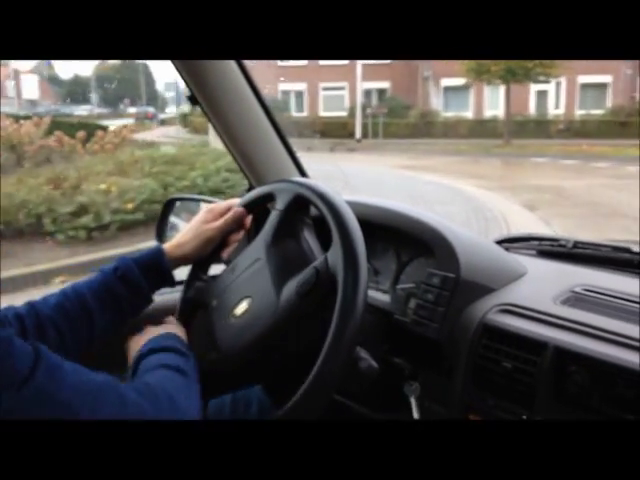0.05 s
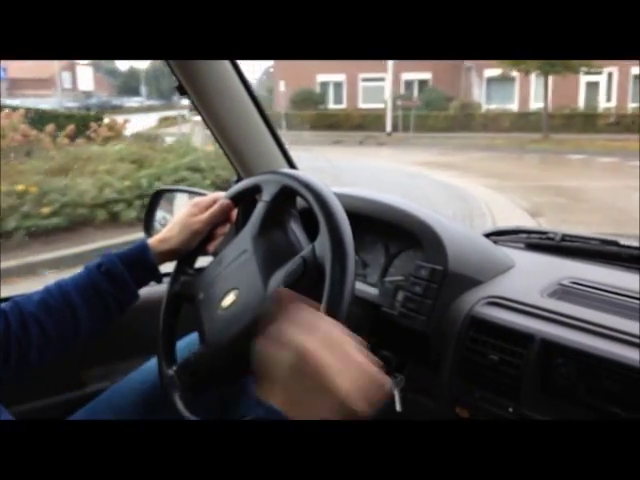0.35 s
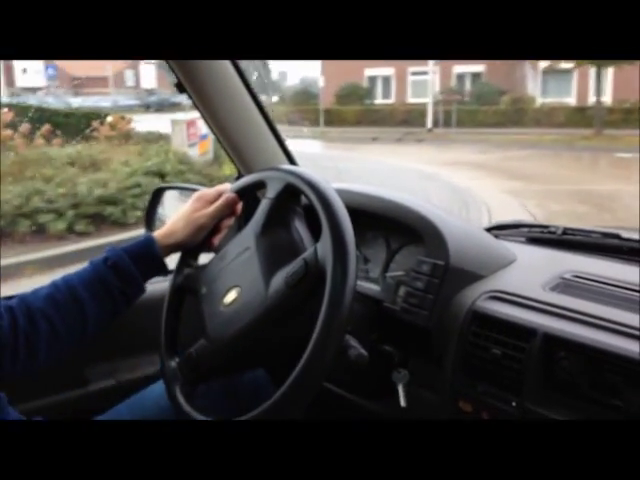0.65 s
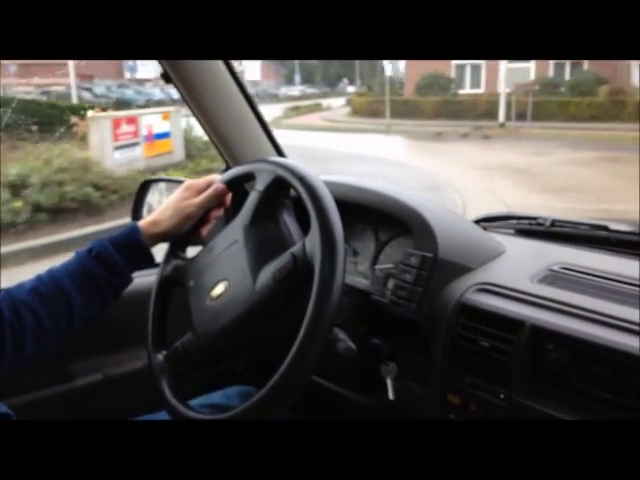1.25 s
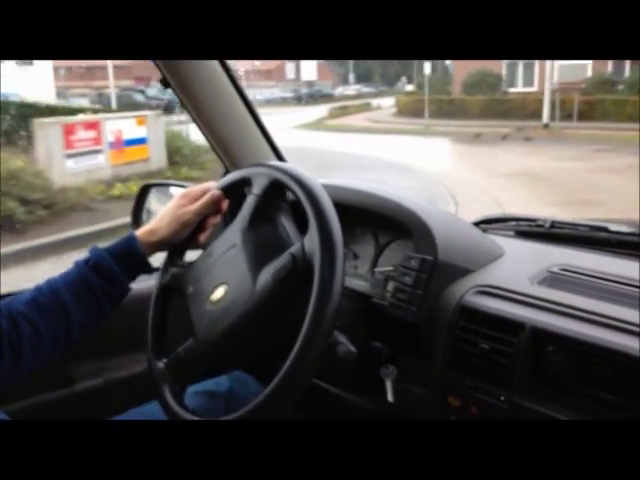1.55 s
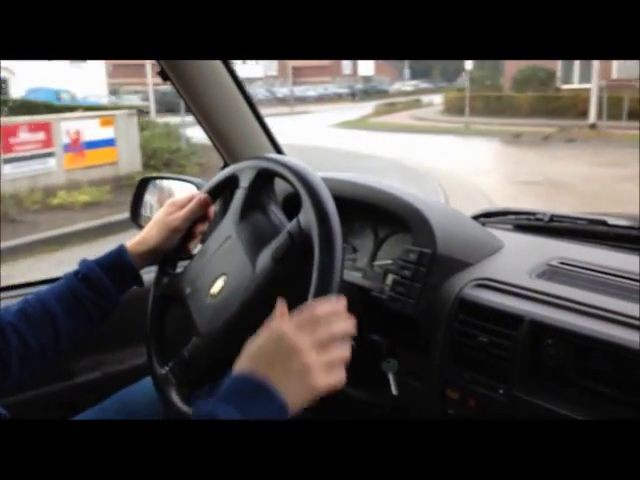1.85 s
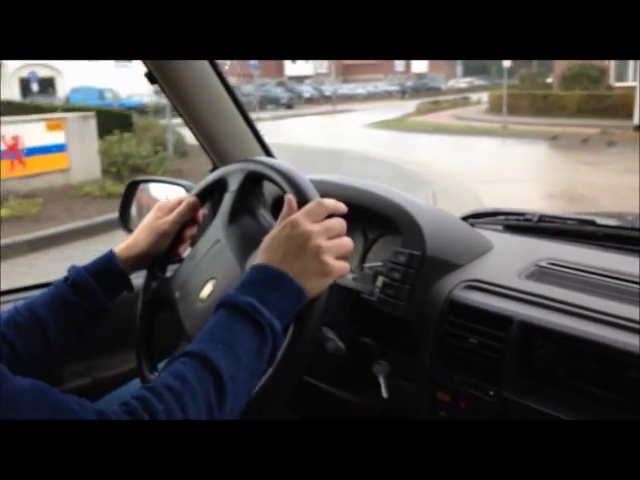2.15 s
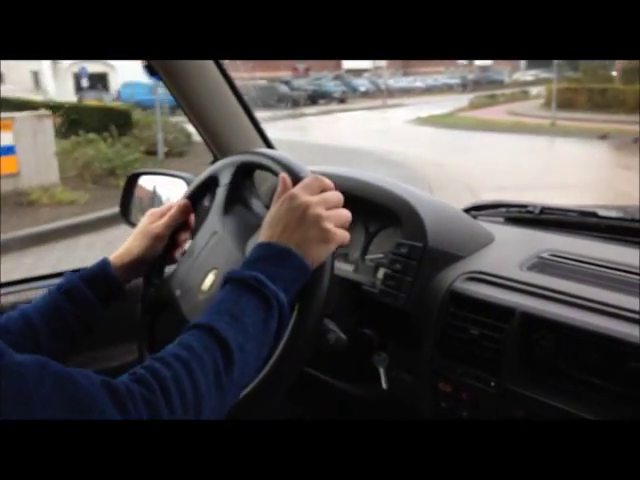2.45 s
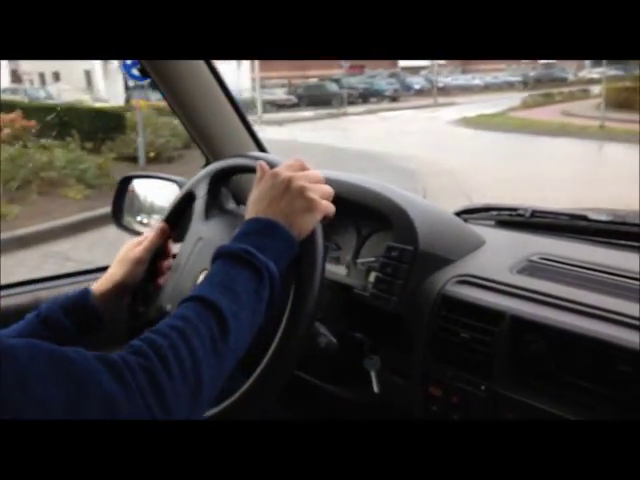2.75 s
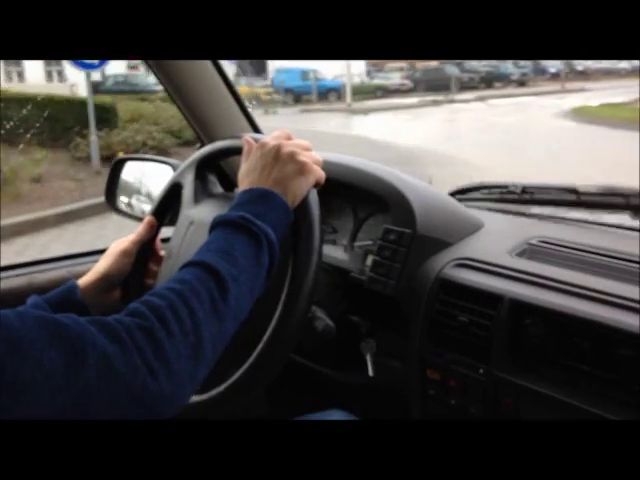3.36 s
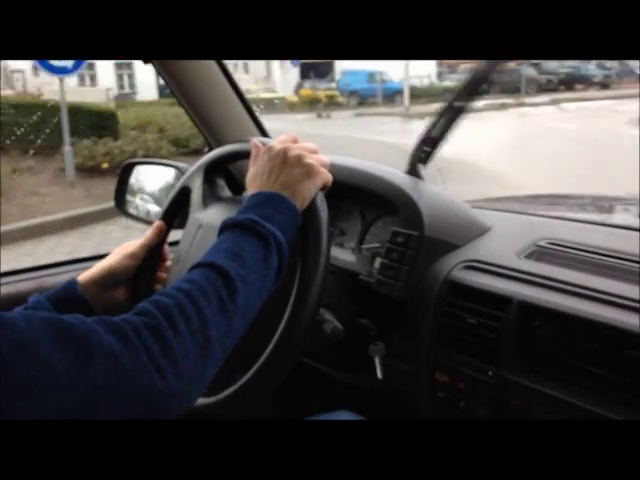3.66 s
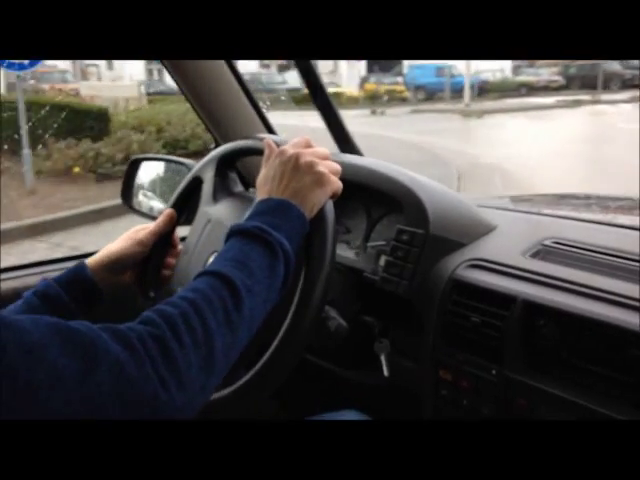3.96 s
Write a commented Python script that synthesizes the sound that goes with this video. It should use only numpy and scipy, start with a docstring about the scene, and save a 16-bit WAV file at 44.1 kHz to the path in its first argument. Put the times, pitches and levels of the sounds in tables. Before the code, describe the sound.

A car engine booms low, heard from the passenger seat, then sinks to near idle over road rumble and faint wet tyre hiss. Trim ticks lightly, the steering whines, a wiper sweeps once, and plastic knocks close by.

```python
"""A five-cylinder engine booms, heard inside a car turning on a wet road, then sinks to near idle as the
driver lifts off. The road rumbles through the body, wet tyres hiss, plastic trim ticks and keys clink.
A rough patch drums the panels, and the power steering moans and whines under load. After a soft tap and
a click, a wiper motor groans and the blade swishes over wet glass; last, plastic knocks close by."""
import sys
import numpy as np
from scipy.fft import rfft, irfft, next_fast_len
from scipy.io import wavfile
from scipy.ndimage import map_coordinates

SR = 44100
rng = np.random.default_rng(int(sys.argv[2]) if len(sys.argv) > 2 else 0)


def transcribe(u):
    """Save the signal u as a 16-bit wav file named by the first command-line argument.

    u: samples, shape (n,) or (channels, n), limited to [-1, 1]; the rate is SR.
    q: integer samples, one column per channel.
    """
    v = np.clip(np.atleast_2d(u).T, -1, 1)
    q = np.round(v * 32767).astype(np.int16)
    wavfile.write(sys.argv[1], SR, q)


N = 176400
TICK_RISE_S, TICK_T60_S, TICK_SLOPE_DB = 0.0019, 0.042, 9


def amp(db):
    """Decibels to gain."""
    return 10 ** (np.asarray(db) / 20)


def unit(x):
    """Scale to rms 1."""
    return x / np.sqrt(np.mean(x ** 2) + 1e-20)


def along(points, hz):
    """Level in dB on an EQ curve of (Hz, dB) points, falling away past its ends."""
    f, db = np.transpose(points)
    log_hz = np.log(np.r_[f[0] / 2, f, f[-1] * 2])
    return np.interp(np.log(hz + 1), log_hz, np.r_[db[0] - 20, db, db[-1] - 20], left=-120, right=-120)


def curves(rows):
    """One automation curve for each column after the time."""
    s, *cols = np.transpose(rows)
    return [np.interp(np.arange(N) / SR, s, c) for c in cols]


def wobble(rate):
    """A smooth random curve, rate knots a second."""
    return map_coordinates(rng.standard_normal(400), [np.arange(N) * rate / SR], mode="mirror")


def swell(s, width_s):
    """A bell-shaped rise and fall around time s."""
    return np.exp(-((np.arange(N) / SR - s) / width_s) ** 2)


def filtered(x, response):
    """Shape x with a frequency response."""
    m = next_fast_len(len(x) + 8192)
    return irfft(rfft(x, m) * response(np.fft.rfftfreq(m, 1 / SR)), m)[:len(x)]


def body(modes, hz):
    """Response of resonances (centre [Hz], width [Hz], gain [dB]) of alternating polarity."""
    return sum((-1) ** k * amp(db) * 1j * hz * width / (centre ** 2 - hz ** 2 + 1j * hz * width)
               for k, (centre, width, db) in enumerate(modes))


def tone(phase):
    """A sine of rms 1 with a random start."""
    return np.sqrt(2) * np.sin(phase + rng.uniform(0, 2 * np.pi))


def noise(spectrum):
    """Coloured noise of rms 1."""
    return unit(filtered(rng.standard_normal(N), lambda hz: amp(along(spectrum, hz))))


def resonant_noise(modes):
    """Noise of rms 1 in a set of resonances."""
    return unit(filtered(rng.standard_normal(N), lambda hz: body(modes, hz)))


def contact(s, centre_hz, slope_db, rise_s, t60_s):
    """A short scuff at time s: a noise burst, slope_db weaker per octave from its centre."""
    t = np.arange(SR // 5) / SR
    shape = (1 - np.exp(-t / rise_s)) * amp(-60 * t / t60_s)
    white = rng.standard_normal(len(t))
    band = filtered(white, lambda hz: amp(-slope_db * np.abs(np.log2((hz + 1) / centre_hz))))
    return np.pad(unit(band) * shape / shape.max(), (round(s * SR), N))[:N]


def ring(s, modes, rise_s=0.0013):
    """Damped modes set ringing at time s."""
    t = np.maximum(np.arange(N) / SR - s, 0)
    partials = sum(amp(db - 60 * t / t60) * np.sin(2 * np.pi * (hz * t + rng.random()))
                   for hz, db, t60 in modes)
    return (1 - np.exp(-t / rise_s)) * partials


def firing():
    """The engine's firing rate and its running phase."""
    # engine speed (time [s], firing rate [Hz])
    speed = [(0, 78.5), (.22, 76.5), (.55, 78.2), (1.02, 75.9), (1.17, 70.5), (1.44, 64), (1.64, 55.8),
             (1.87, 46.9), (2.05, 45.2), (2.2, 42.3), (2.62, 44.3), (2.9, 42), (3.35, 44), (3.75, 43.8),
             (4, 45.2)]
    hz, = curves(speed)
    return hz, 2 * np.pi * np.cumsum(hz) / SR


def engine(firing_hz, phase):
    """The firing note booms, uneven cylinders growl, each firing pulses a clatter, and the bay whirrs."""
    # the boom (time [s], firing note [dB], its octave [dB])
    boom_levels = [(0, -28.5, -44.5), (.22, -29, -47), (.34, -26.5, -39.5), (.68, -30, -44),
                   (.85, -25.5, -40), (1.07, -32.5, -37.5), (1.15, -47.5, -45), (1.47, -37.5, -44),
                   (1.67, -39.5, -35), (1.8, -38.5, -48), (4, -38, -46.5)]
    # a harmonic that hums as the car pulls away (time [s], level [dB])
    pull_levels = [(2.5, -60.5), (3.3, -50.5), (4, -49.5)]
    # engine effort (time [s], gain [dB])
    load = [(.5, -0.5), (1.15, -2), (1.65, -8), (2.5, -13), (3.3, -8), (4, -6.5)]
    # EQ of the growling orders (frequency [Hz], base level [dB])
    growl_eq = [(100, -60), (135, -56), (185, -54), (225, -55), (290, -62), (400, -68), (850, -77)]
    # EQ of the clatter (frequency [Hz], gain [dB])
    clatter_eq = [(300, -30), (690, 5), (900, -9), (1330, 4), (1600, -7), (1950, -3), (2700, -12),
                  (9000, -33)]
    # narrow whirrs from the engine bay (centre [Hz], width [Hz], level [dB])
    whirr_bands = [(1960, 160, -70.5), (4600, 490, -79)]
    cylinders, pull_harmonic = 5, 5
    note_db, octave_db = curves(boom_levels)
    load_db, = curves(load)
    pull_db, = curves(pull_levels)
    boom = amp(note_db) * tone(phase) + amp(octave_db) * tone(2 * phase)
    hum = amp(pull_db) * tone(pull_harmonic * phase)
    growl = 0
    for k in np.setdiff1d(np.arange(4, 66), [cylinders, 2 * cylinders, pull_harmonic * cylinders]):
        order = k / cylinders
        accent_db = 6 * (k % cylinders == 0 or k % 2 == 0)  # multiples of the firing and crank rates
        db = along(growl_eq, order * firing_hz) + load_db + accent_db + 2 * wobble(rate=6)
        growl += amp(db) * tone(order * phase)
    pulse = np.exp(0.19 * np.cos(phase))
    clatter = unit(noise(clatter_eq) * pulse) * amp(-56.5 + 2.57 * load_db)
    whirr = sum(amp(db) * resonant_noise([(hz, width, 0)]) for hz, width, db in whirr_bands)
    return boom + hum + growl + whirr + clatter


def road():
    """The wheels shake the body in three registers; water hisses under the tyres."""
    # road noise (time [s], rumble [dB], body drone [dB], tyre roar [dB])
    road_levels = [(.65, -41, -49, -56.5), (1.05, -34, -44, -53.5), (1.38, -34.5, -39, -56.5),
                   (1.52, -37.5, -45.5, -55.5), (1.8, -41, -43.5, -56.5), (1.98, -33.5, -42, -51),
                   (2.12, -40, -43, -52.5), (3.15, -39, -44.5, -55), (3.5, -41, -39.5, -53.5),
                   (3.7, -33.5, -49, -56.5), (4, -35.5, -42.5, -51)]
    # wet hiss (time [s], base level [dB])
    hiss_levels = [(.8, -70), (1.45, -66.5), (1.6, -70.5), (2.6, -74), (4, -72.5)]
    # EQs of the rumble, drone, roar and hiss (frequency [Hz], gain [dB])
    rumble_eq = [(28, -3), (40, -6), (55, 6), (85, 3), (105, -8.5), (180, -24.5)]
    drone_eq = [(60, -33), (100, -2), (132, 5.5), (170, -6), (215, -8.5), (300, -18), (370, -13.5),
                (450, -16), (900, -58)]
    roar_eq = [(200, -17), (370, 4.5), (415, -4.5), (480, 5), (700, -2), (1200, -7.5), (2000, -15.5),
               (2900, -22), (6000, -36.5)]
    hiss_eq = [(500, -28), (2000, 6), (4700, 0.5), (15000, -6.5)]
    rumble_db, drone_db, roar_db = curves(road_levels)
    hiss_db, = curves(hiss_levels)
    rumble = noise(rumble_eq) * amp(rumble_db)
    drone = noise(drone_eq) * amp(drone_db + 2.37 * wobble(rate=12))
    roar = noise(roar_eq) * amp(roar_db + 1.67 * wobble(rate=30.49))
    hiss = noise(hiss_eq) * amp(hiss_db + 2.5 + 1.5 * wobble(rate=40))
    return rumble + drone + roar + hiss


def trim_ticks():
    """Plastic trim ticks lightly; the duller the tick, the slower it rises and dies."""
    # ticks (time [s], level [dB], centre [Hz])
    hits = [(.055, -59, 2786), (.09, -58, 3200), (0.777, -50.5, 1800), (0.969, -57.5, 4000),
            (1.103, -50.5, 1900), (1.28, -61, 4000), (1.366, -46.5, 770), (2.558, -63.5, 3800),
            (3.288, -58.5, 3940), (3.325, -65, 4650), (3.534, -53, 1390), (3.914, -51.5, 3280),
            (3.945, -46, 2330)]
    ticks = 0
    for s, db, centre_hz in hits:
        stretch = np.sqrt(3500 / centre_hz)
        ticks += amp(db) * contact(s, centre_hz, TICK_SLOPE_DB, TICK_RISE_S * stretch, TICK_T60_S * stretch)
    return ticks


def keys():
    """The ignition keys touch and chatter for an instant."""
    # clinks (time [s], level [dB])
    touches = [(1.045, -54), (1.107, -61)]
    # key resonances (centre [Hz], width [Hz], gain [dB])
    modes = [(3200, 370, -6), (5000, 410, -3)]
    clinks = 0
    for s, db in touches:
        t = np.maximum(np.arange(N) / SR - s, 0)
        shape = (1 - np.exp(-t / TICK_RISE_S)) * amp(-60 * t / TICK_T60_S)
        clinks += amp(db) * resonant_noise(modes) * shape / shape.max()
    return clinks


def rough_patch():
    """A rough patch of road makes the body panels drum."""
    # panel resonances (centre [Hz], width [Hz], gain [dB])
    panels = [(129, 23.5, -3.5), (199, 35, -6), (270, 28, -5.5), (526, 130, -18.5)]
    return amp(-38) * swell(1.328, width_s=0.17) * resonant_noise(panels)


def steering(firing_hz, phase):
    """Loaded power steering: engine harmonics moan in a resonance; the pump whines with the revs."""
    # the moan's resonance (centre [Hz], width [Hz], gain [dB])
    resonance = [(628, 87, 1.5)]
    # the moan and the belt-driven pump's whine (time [s], base level [dB])
    moan_levels = [(1.78, -74), (1.92, -52), (2.15, -57.5), (2.6, -53), (3.15, -67)]
    pump_levels = [(1.8, -79), (1.97, -52), (2.15, -61)]
    pump_order = 11.2
    moan_db, = curves(moan_levels)
    pump_db, = curves(pump_levels)
    moan = sum(np.abs(body(resonance, k * firing_hz)) * amp(2 * wobble(rate=10)) * tone(k * phase)
               for k in range(13, 18))
    whine = amp(pump_db + 2.1 * wobble(rate=10)) * tone(pump_order * phase)
    return amp(moan_db) * moan / 2 + whine


def tap():
    """A soft hollow tap: one quickly damped mode."""
    # the hollow mode (frequency [Hz], level [dB], T60 [s])
    mode = [(850, -44, .035)]
    return ring(3.387, mode)


def click(s=3.449):
    """A switch-like click: a bright snap and its ring."""
    # the click's modes (frequency [Hz], gain [dB], T60 [s])
    modes = [(2970, -2, 0.046), (3330, 3.5, 0.042), (4100, -2, 0.036)]
    snap = contact(s, centre_hz=5000, slope_db=TICK_SLOPE_DB, rise_s=TICK_RISE_S, t60_s=0.046)
    return amp(-53.5) * snap + amp(-43) * ring(s, modes)


def wiper():
    """The motor groans as it starts, then the blade swishes once over wet glass, slightly grainy."""
    # motor resonance (centre [Hz], width [Hz], gain [dB])
    motor = [(382, 40, 0)]
    # EQ of the blade on glass (frequency [Hz], gain [dB])
    blade_eq = [(600, -14), (1500, 0), (14000, -16)]
    groan = amp(-49) * swell(3.527, width_s=0.15) * resonant_noise(motor)
    swish = unit(noise(blade_eq) * amp(4.5 * wobble(rate=150)))
    return groan + amp(-65.5) * swell(3.63, width_s=0.068) * swish


def knock():
    """Something plastic knocks close by: three quick contacts, each duller, and a short ring."""
    # contacts (time [s], level [dB], centre [Hz])
    hits = [(3.9677, -32.5, 5700), (3.9703, -32.5, 3400), (3.9763, -33.5, 2020)]
    # modes of the plastic (frequency [Hz], gain [dB], T60 [s])
    modes = [(211, -1.5, 0.069), (524, -4, 0.051), (1515, 0.5, 0.03), (2790, -4, 0.032),
             (3030, -2.5, 0.045)]
    attack = sum(amp(db) * contact(s, hz, slope_db=9.5, rise_s=0.00055, t60_s=0.046) for s, db, hz in hits)
    return attack + amp(-26.5) * ring(3.973, modes)


def scene():
    """Everything as heard from the passenger seat, in mono."""
    firing_hz, phase = firing()
    driving = engine(firing_hz, phase) + road() + rough_patch() + steering(firing_hz, phase)
    cabin = trim_ticks() + keys() + tap() + click() + wiper() + knock()
    return (driving + cabin)[None]


def record(dry, top_hz=15350):
    """A brick-wall low-pass takes off the highest treble."""
    return np.array([filtered(x, lambda hz: hz < top_hz) for x in dry])


dry = scene()
out = record(dry)
transcribe(out)
```